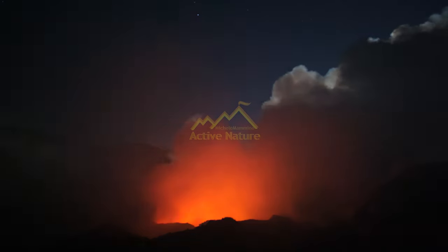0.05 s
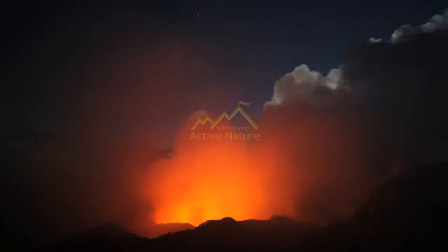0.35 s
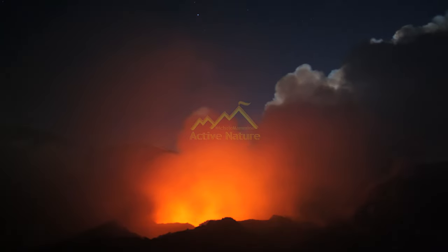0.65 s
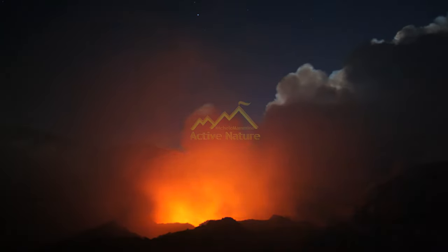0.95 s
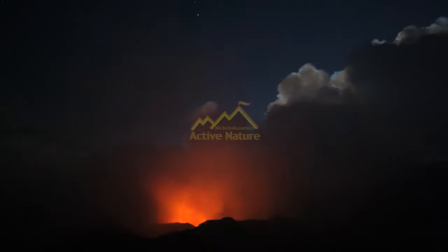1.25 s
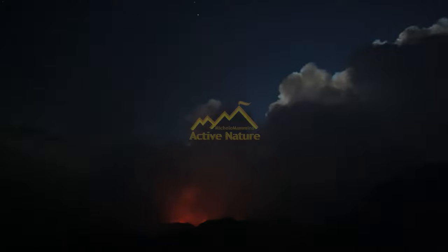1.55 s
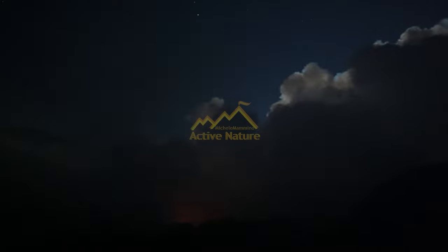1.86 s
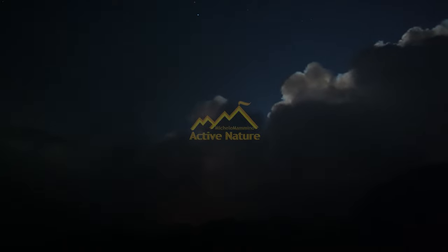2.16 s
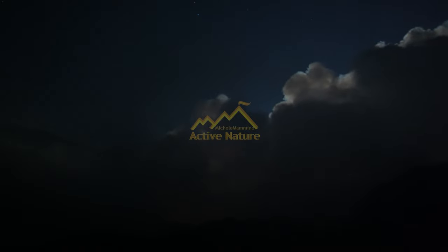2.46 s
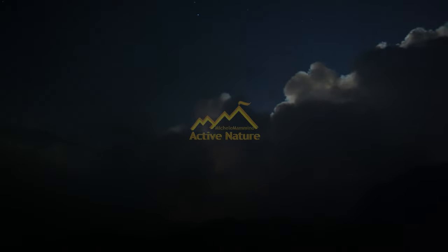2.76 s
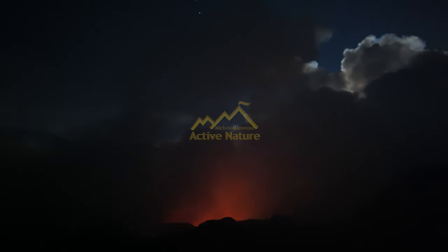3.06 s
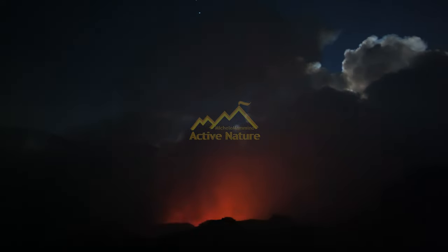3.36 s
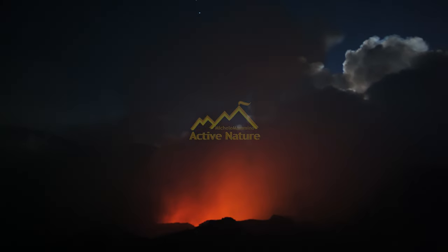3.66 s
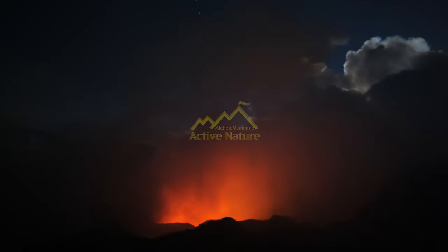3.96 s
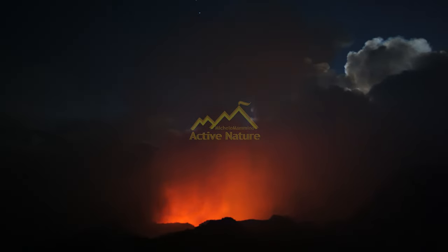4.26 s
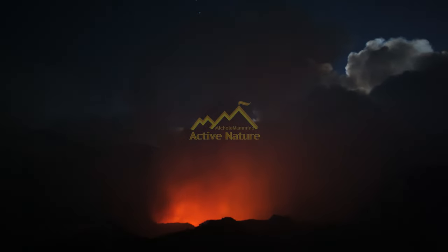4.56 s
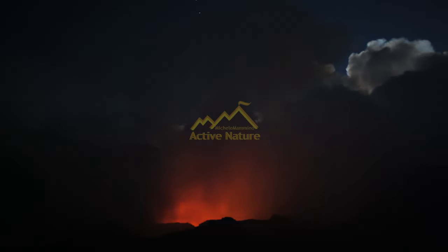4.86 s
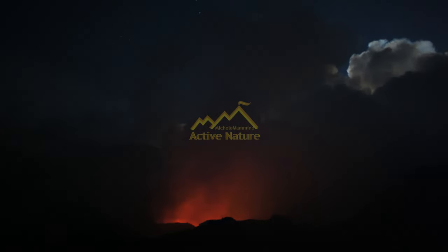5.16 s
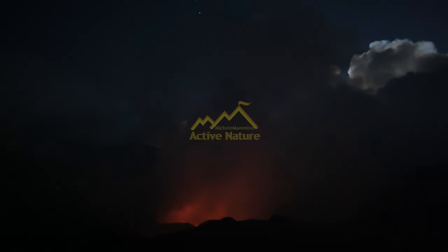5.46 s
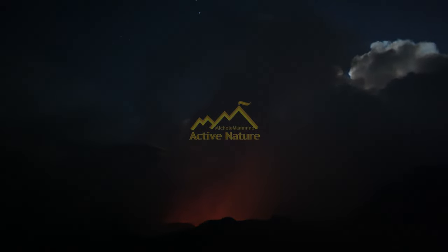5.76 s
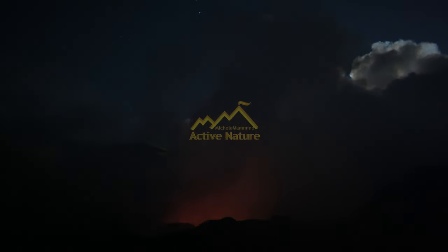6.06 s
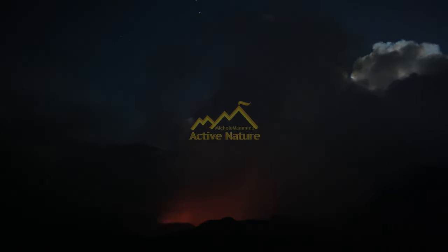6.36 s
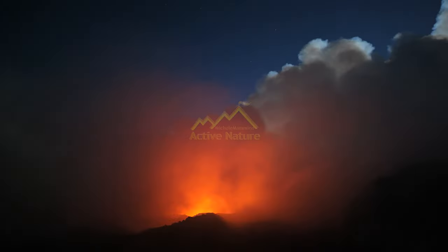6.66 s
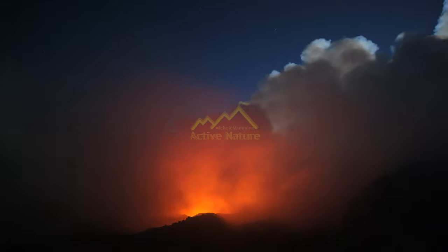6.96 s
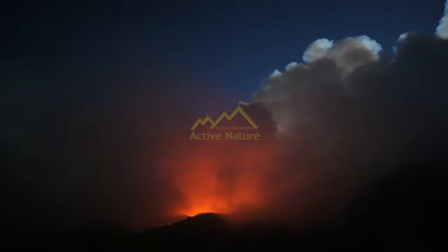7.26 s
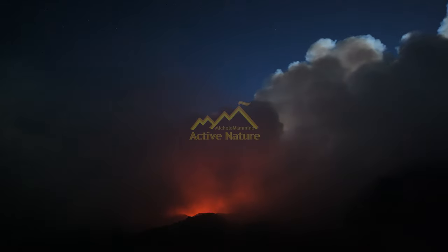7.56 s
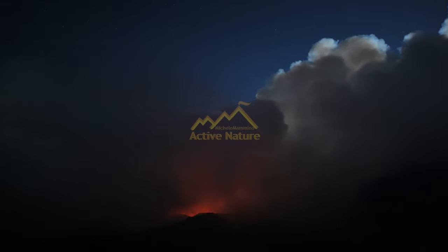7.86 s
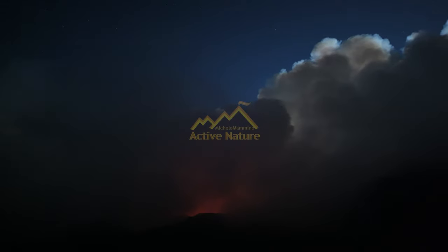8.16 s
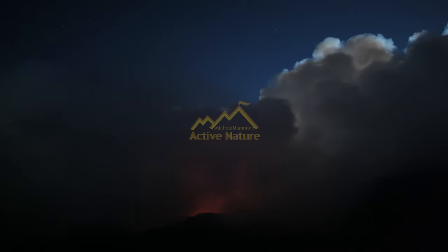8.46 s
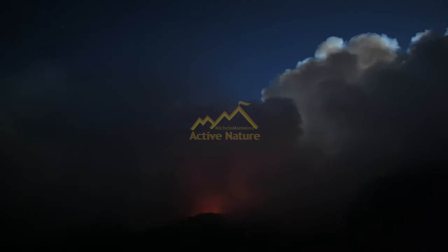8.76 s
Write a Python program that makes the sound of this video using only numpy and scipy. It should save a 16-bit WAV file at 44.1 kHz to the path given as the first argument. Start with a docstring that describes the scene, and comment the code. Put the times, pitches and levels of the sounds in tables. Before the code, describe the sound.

Wind rumbles on an outdoor microphone from about 0.2 seconds, over a faint hiss. A distant volcanic vent releases a deep roar of gas with a boom, peaking near 0.9 seconds and fading slowly. Gusts give soft, low thumps around 1.9 and 2.3 seconds. At 2.9 seconds a small click marks an abrupt change, and a brighter, rasping jet swells quickly with a low boom, peaking near 3.3 seconds. Two more rasping surges rise and fade at about 4.5 and 5.5 seconds, with wind bumping the microphone. Just before 6.5 seconds everything cuts to silence. The sound returns with a click at 6.8 seconds, the vent now only a faint rumble. Stronger, fluttering gusts and soft thumps dominate until the end at 9 seconds, with a few tiny dry crackles around 7.7 to 8.1 seconds.

```python
"""Volcanic crater at night

A distant vent in three scenes joined by hard cuts, the last after a short silence. Gas jets swell and
fade: one deep roar with a boom, then three brighter, rasping ones; at the end the vent only murmurs.
Wind buffets the microphone in every scene, with soft thumps from single eddies, over a faint hiss.
Two of the cuts click, and a few tiny crackles ride the late gusts."""
import sys
import numpy as np
from scipy import signal
from scipy.fft import rfft, irfft, next_fast_len
from scipy.io import wavfile
from scipy.ndimage import uniform_filter1d, map_coordinates

SR = 44100
rng = np.random.default_rng(int(sys.argv[2]) if len(sys.argv) > 2 else 0)


def unload_audio(sound):
    """Save the sound as a 16-bit wav file, at the path given as the first command line argument."""
    columns = np.transpose(np.atleast_2d(sound))
    # keep every value between -1 and 1, then stretch to whole-number steps
    steps = np.round(np.clip(columns, -1, 1) * 32767)
    wavfile.write(sys.argv[1], SR, steps.astype(np.int16))


N = 397782


def amp(db):
    """Decibels to gain."""
    return 10 ** (np.asarray(db) / 20)


def together(levels):
    """The level in dB of unrelated sounds heard at once."""
    return 10 * np.log10(sum(amp(db) ** 2 for db in levels))


def unit(x):
    """Scale to rms 1."""
    return x / np.sqrt(np.mean(x ** 2) + 1e-20)


def clock():
    """The time of every sample in seconds."""
    return np.arange(N) / SR


def curves(rows):
    """One automation curve for each column after the time."""
    times, *columns = np.transpose(rows)
    return [np.interp(clock(), times, column) for column in columns]


def wobble(rate):
    """A smooth random curve, rate knots a second."""
    knots = rng.standard_normal(int(N * rate / SR) + 4)
    return map_coordinates(knots, [clock() * rate], mode="nearest")


def impulses(rows):
    """One spike for each row of seconds and dB."""
    spikes = np.zeros(N)
    for s, db in rows:
        spikes[round(s * SR)] = amp(db)
    return spikes


def filtered(x, response):
    """Filter x by a gain that depends on frequency."""
    size = next_fast_len(N + SR // 2)
    return irfft(rfft(x, size) * response(np.fft.rfftfreq(size, 1 / SR)), size)[..., :N]


def coloured(x, colour):
    """EQ x through points of Hz and dB joined on a log axis."""
    points_hz, db = np.transpose(colour)
    return filtered(x, lambda hz: amp(np.interp(np.log(hz + 1), np.log(points_hz), db)))


def noise(colour):
    """Noise of rms 1 with the given colour."""
    return unit(coloured(rng.standard_normal(N), colour))


def churn(colour):
    """Low turbulence whose strength holds steady from one tenth of a second to the next."""
    x = noise(colour)
    power = uniform_filter1d(uniform_filter1d(x ** 2, size=SR // 14), size=SR // 20)
    return x / np.sqrt(np.abs(power) + 1e-6)


# The thin colour of the hiss. Each row: frequency in Hz, gain in dB.
HISS_COLOUR = [(100, -7), (1500, -26), (3500, 7), (6000, 6.5), (15000, 5)]


def microphone_hiss():
    """The microphone's own even noise, different in each ear."""
    return np.array([noise(HISS_COLOUR), noise(HISS_COLOUR)])


# The bed of wind. Each row: time in seconds, buffet level in dB.
STEADY_WIND = [(0.22, -31.5), (0.6, -24), (0.9, -33.5), (1.55, -39), (2.0, -28.5), (2.85, -33),
               (2.9, -46.5), (3.15, -30), (3.8, -33.5), (4.3, -44.5), (5.0, -31), (6.3, -25), (6.45, -41),
               (6.9, -24), (7.3, -41), (7.6, -24), (8.35, -27.5), (8.8, -22), (9.0, -29.5)]
# Gusts on top. Each row: peak time in seconds, buffet in dB, flutter in dB, half length in seconds.
WIND_GUSTS = [(0.382, -19.5, -48, 0.097), (0.602, -18.5, -39, 0.11), (0.738, -15, -26, 0.073),
              (1.855, -18, -33, 0.055), (2.28, -19, -33.5, 0.058), (2.53, -25, -47, 0.023),
              (3.142, -24.5, -32.5, 0.11), (4.027, -34, -57, 0.12), (4.651, -15.5, -37, 0.037),
              (5.275, -28, -52, 0.04), (5.498, -15.5, -27.5, .055), (5.632, -23, -35, 0.036),
              (5.816, -23.5, -37.5, 0.027), (6.072, -21, -32.5, 0.026), (6.158, -24, -34, 0.02),
              (6.847, -25, -29, 0.052), (7.091, -16, -21, 0.1), (7.334, -25.5, -35.5, 0.028),
              (7.519, -14.5, -26.5, 0.073), (7.683, -10.5, -21.5, 0.043), (7.863, -15, -20.5, 0.074),
              (8.041, -19.5, -30.5, 0.059), (8.186, -20, -36, 0.024), (8.463, -17, -24.5, .04),
              (8.572, -22.5, -26, .03), (8.667, -15, -25, .05), (8.849, -22.5, -31, 0.077),
              (8.949, -21.5, -24, 0.019)]


def airflow(flutter_offset_db, restless_db, flank_db):
    """Buffet and flutter levels in dB: bell-shaped gusts ride on a restless steady wind."""
    steady = curves(STEADY_WIND)[0] + restless_db * wobble(14)
    buffet, flutter = [steady], [steady + flutter_offset_db]
    for peak_s, buffet_db, flutter_db, half_s in WIND_GUSTS:
        drop = flank_db * np.minimum(((clock() - peak_s) / half_s) ** 2, 20)
        buffet.append(buffet_db - drop)
        flutter.append(flutter_db - drop)
    return together(buffet), together(flutter)


# The wind's three colours, darkest first. Each row: frequency in Hz, gain in dB.
BUFFET_COLOUR = [(5, -20), (20, 0), (45, 1.5), (70, -1), (115, -7), (160, -18), (230, -35), (400, -51),
                 (1000, -89.5)]
FLUTTER_COLOUR = [(60, -16), (120, 11), (175, 0.5), (250, -5), (350, -20.5), (500, -33.5), (800, -49.5),
                  (1500, -74), (4000, -100)]
FLAP_COLOUR = [(150, -22), (280, 3.5), (450, -3.5), (650, -12.5), (1000, -26), (2000, -50.5), (5000, -71)]


def buffeting(buffet_db, flutter_db, buffet_trim_db, flutter_trim_db, flap_trim_db):
    """Wind on the microphone: flutter comes in short lumps over the rumble; hard gusts flap brighter."""
    lumpy_db, flap_knee_db, flap_growth = 3.5, -19, 1.44
    lumps = unit(amp(lumpy_db * wobble(50)))
    flap_db = flap_knee_db + flap_growth * (flutter_db - flap_knee_db)
    flutter = amp(flutter_db + flutter_trim_db) * churn(FLUTTER_COLOUR)
    flap = amp(flap_db + flap_trim_db) * churn(FLAP_COLOUR)
    rumble = amp(buffet_db + buffet_trim_db) * churn(BUFFET_COLOUR)
    return rumble + lumps * (flutter + flap)


# Surges of gas. Each row: peak time in seconds, roar and rasp in dB before the jet's trims,
# boom in dB, swell and fade in dB per second.
GAS_OUTBURSTS = [(0.87, -22, -52.5, -20, 39, 19.5), (3.27, -28.5, -39.7, -27.5, 106, 19),
                 (4.51, -32.5, -42, -53, 40.5, 29), (5.53, -34, -46.3, -50.5, 21, 35.5)]


def outflow(idle, rasp_growth):
    """Roar and rasp levels in dB: each outburst swells, rounds off and fades back to the idling vent."""
    crest_s, rasp_lead_s = 0.089, 0.039  # the top lingers; the rasp opens and closes ahead of the roar

    def drop(age, swell, fade):
        return np.where(age < 0, swell, fade) * (np.hypot(age, crest_s) - crest_s)

    roar, rasp = ([level] for level in curves(idle))
    for peak_s, roar_db, rasp_db, _, swell, fade in GAS_OUTBURSTS:
        age = clock() - peak_s
        roar.append(roar_db - drop(age, swell, fade))
        rasp.append(rasp_db - rasp_growth * drop(age + rasp_lead_s, swell, fade))
    return together(roar), together(rasp)


# The idling vent, one table a scene. Each row: time in seconds, roar and rasp in dB before the trims.
DEEP_VENT = [(0.22, -58.5, -59.5), (1.8, -43.5, -58.5), (2.85, -44, -61)]
BRIGHT_VENT = [(2.87, -81.5, -79), (3.5, -45, -61), (6.45, -46, -57.5)]
FAR_VENT = [(6.83, -67, -72), (7.4, -66, -70), (7.9, -68, -74), (8.3, -68.5, -73), (8.75, -65.5, -72),
            (9.0, -60, -67.5)]
# Each scene's roar, and the rasp they share. Each row: frequency in Hz, gain in dB.
DEEP_COLOUR = [(25, -6.5), (90, -4.5), (160, 0), (280, 0), (360, -1), (500, -4), (720, -6), (1000, -10.5),
               (1500, -23.5), (2500, -36.5), (5000, -91.5)]
BRIGHT_COLOUR = [(25, -3.5), (110, -4.5), (190, -2.5), (320, 1.5), (410, 0), (510, -1), (820, -1),
                 (1150, -7.5), (1600, -19.5), (2500, -31.5), (5000, -78)]
FAR_COLOUR = [(30, -9.5), (250, -3.5), (500, -0.5), (950, 0), (1300, -10.5), (2000, -34), (5000, -79.5)]
RASP_COLOUR = [(500, -31.5), (1100, 2.5), (1500, 0), (2300, -3.5), (2700, -8), (3300, -14), (4000, -22.5),
               (5000, -32.5), (6500, -47), (12000, -79)]


def gas_jet(idle, colour, roar_trim_db, rasp_trim_db, rasp_growth, rough_db):
    """Turbulent gas leaves the vent: a roar with a rasp above it."""
    roar_db, rasp_db = outflow(idle, rasp_growth)
    tumble = amp(rough_db * wobble(45))  # passing vortices roughen the whole jet
    roar = amp(roar_db + roar_trim_db) * noise(colour)
    rasp = amp(rasp_db + rasp_trim_db) * noise(RASP_COLOUR)
    return tumble * (roar + rasp)


# Soft thumps of air. Each row: time in seconds, peak in dB before the trim, pitch in Hz.
EDDY_THUMPS = [(0.352, -7.5, 62), (0.774, -11.5, 65.5), (1.863, -6.5, 70.4), (2.304, -8.5, 64),
               (2.527, -9, 49), (4.648, -11.5, 91), (5.45, -6, 70), (5.492, -3, 44.5), (7.012, -13.5, 131),
               (7.068, -9, 124), (7.082, -3.5, 69.3), (7.12, -4, 77.3), (7.678, -0.5, 66.3),
               (7.704, -7.5, 83.6), (7.829, -3.5, 91), (7.845, -2.5, 49.9), (7.892, -10, 115),
               (8.201, -13, 95.5), (8.463, -4.5, 84.52), (8.581, -16.5, 161), (8.670, -9, 90.8),
               (8.858, -7, 59.4), (8.951, -12.5, 134)]


def eddies(turbulence, trim_db, calm_s):
    """An eddy sweeps finer turbulence aside: one dip of pressure with a small rise on either side."""
    thumps, shelter, t = np.zeros(N), np.ones(N), clock()
    for s, db, hz in EDDY_THUMPS:
        distance_sq = (np.pi * hz * (t - s)) ** 2  # small eddies pass faster and sound higher
        thumps -= amp(db + trim_db) * (1 - 3 * distance_sq) / (1 + distance_sq) ** 3
        shelter += 1 / (1 + ((t - s) / calm_s) ** 2)
    return turbulence / shelter + thumps


# The low weight under an outburst. Each row: frequency in Hz, gain in dB.
BOOM_COLOUR = [(20, -15), (80, -8), (160, -1), (270, -1.5), (370, -5.5), (600, -16.5), (2000, -71.5)]


def booms(swell_s, fade_s):
    """An outburst shoves a large mass of gas: it swells quickly and drains away."""
    shove = np.zeros(N)
    for peak_s, _, _, boom_db, _, _ in GAS_OUTBURSTS:
        age = clock() - peak_s
        shove += amp(boom_db) * np.exp(np.where(age < 0, -(age / swell_s) ** 2, -age / fade_s))
    return shove * churn(BOOM_COLOUR)


# Ticks at the cuts. Each row: time in seconds, peak in dB.
CUT_CLICKS = [(2.859, -27), (6.825, -29)]


def clicks(decay_s):
    """A sudden step of pressure that leaks away."""
    leak = np.exp(-1 / (decay_s * SR))
    return signal.lfilter([1], [1, -leak], impulses(CUT_CLICKS))


# Tiny crackles in the hardest gusts. Each row: time in seconds, peak in dB.
GUST_CRACKLES = [(7.6765, -31), (7.6808, -40.5), (7.832, -44), (7.887, -37), (8.137, -43.5)]
# Their colour. Each row: frequency in Hz, gain in dB.
CRACKLE_COLOUR = [(300, 1), (800, 3), (1500, -11.5), (4500, -15.5), (7000, -24), (11000, -23.5),
                  (16000, -34)]


def crackles():
    """Each crackle is a single dry snap with no ring."""
    spikes = impulses(GUST_CRACKLES)
    snaps = coloured(spikes, CRACKLE_COLOUR)
    return snaps * spikes.max() / snaps.max()


# The three scenes. Each row: start and end in seconds, hiss in dB,
# the steady wind's flutter in dB relative to its buffet, before the trims.
SCENES = [(0.207, 2.859, -64, -22.5), (2.857, 6.463, -67, -19.5), (6.826, 9.1, -73.5, -12)]


def scene():
    """Crater and wind, gated scene by scene and alike in both ears; only the hiss is wide."""
    t = clock()
    gates = np.array([(t >= start) & (t < end) for start, end, _, _ in SCENES], float)
    gates = uniform_filter1d(gates, size=SR // 400)  # 2.5 ms ramps
    _, _, hiss_db, flutter_offset_db = np.transpose(SCENES)
    deep = gas_jet(DEEP_VENT, DEEP_COLOUR, roar_trim_db=1.5, rasp_trim_db=1.8,
                   rasp_growth=0.55, rough_db=0.6)
    bright = gas_jet(BRIGHT_VENT, BRIGHT_COLOUR, roar_trim_db=1.5, rasp_trim_db=3.5,
                     rasp_growth=1.055, rough_db=0.08)
    far = gas_jet(FAR_VENT, FAR_COLOUR, roar_trim_db=5, rasp_trim_db=4, rasp_growth=1.25, rough_db=1.5)
    crater = np.sum(gates * [deep, bright, far], axis=0) + booms(swell_s=0.14, fade_s=0.34)
    buffet_db, flutter_db = airflow(flutter_offset_db @ gates, restless_db=3.5, flank_db=8)
    turbulence = buffeting(buffet_db, flutter_db,
                           buffet_trim_db=-0.07, flutter_trim_db=1.5, flap_trim_db=-14)
    wind = eddies(turbulence, trim_db=-1.5, calm_s=0.0081) + crackles()
    hiss = (amp(hiss_db) @ gates) * microphone_hiss()
    return (crater + wind) * gates.sum(axis=0) + hiss + clicks(decay_s=0.001)


def record(dry):
    """The right channel is a hair louder, and the highest treble is cut off."""
    right_db, top_hz = 0.12, 15800
    return filtered(dry * amp([[0], [right_db]]), lambda hz: hz < top_hz)


dry = scene()
out = record(dry)
unload_audio(out)
```